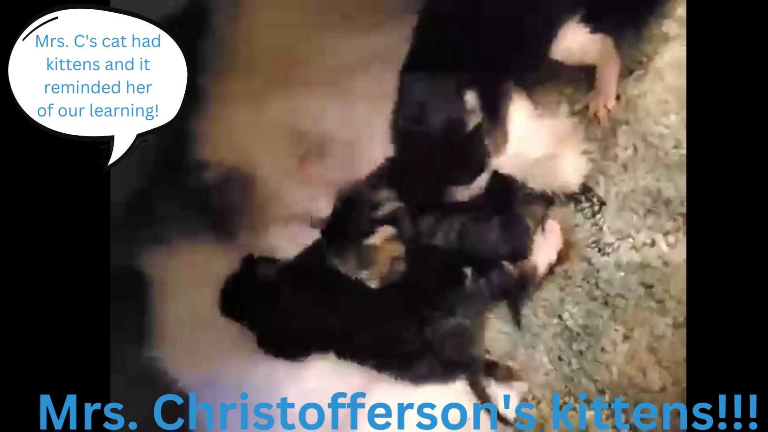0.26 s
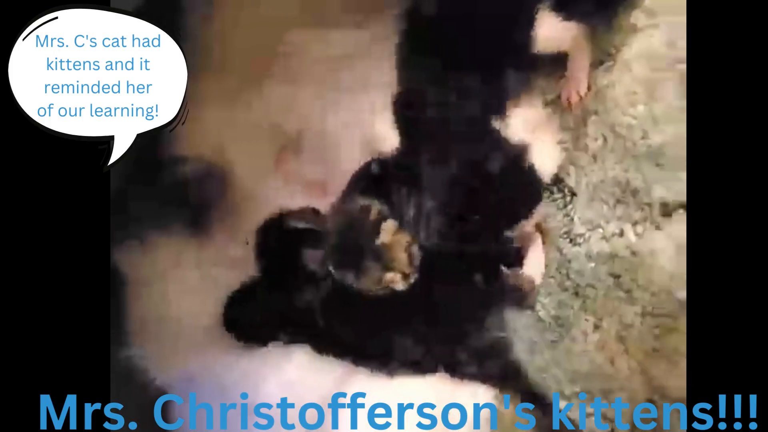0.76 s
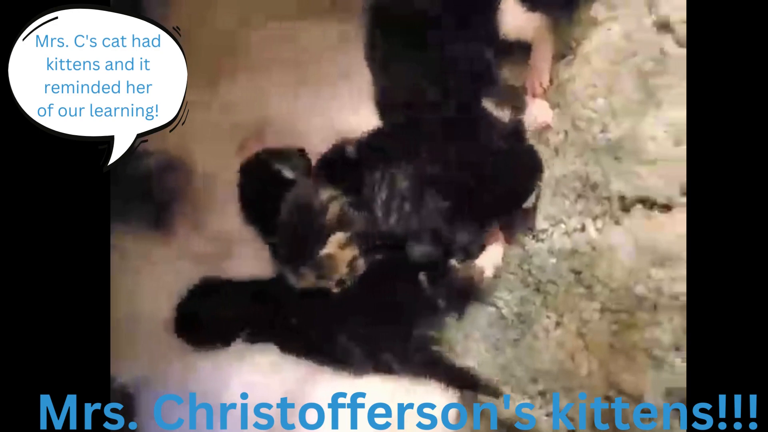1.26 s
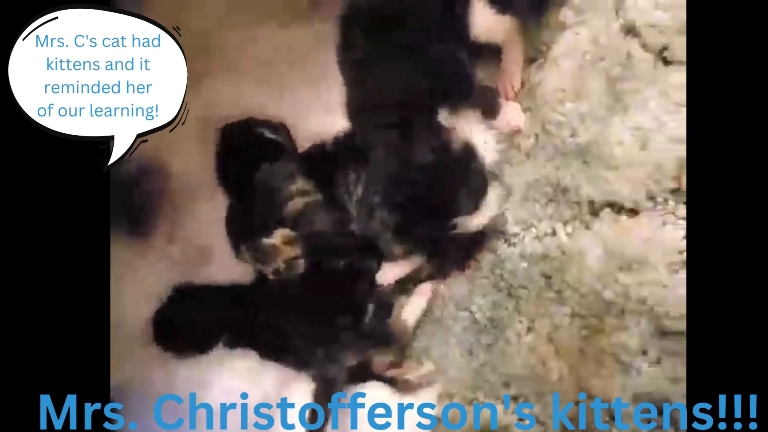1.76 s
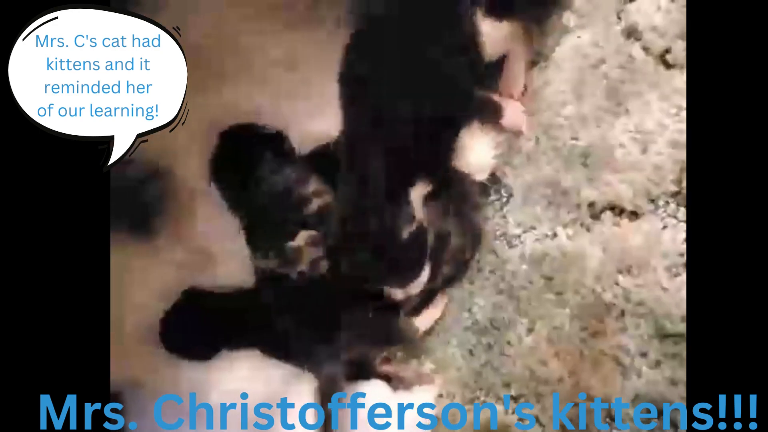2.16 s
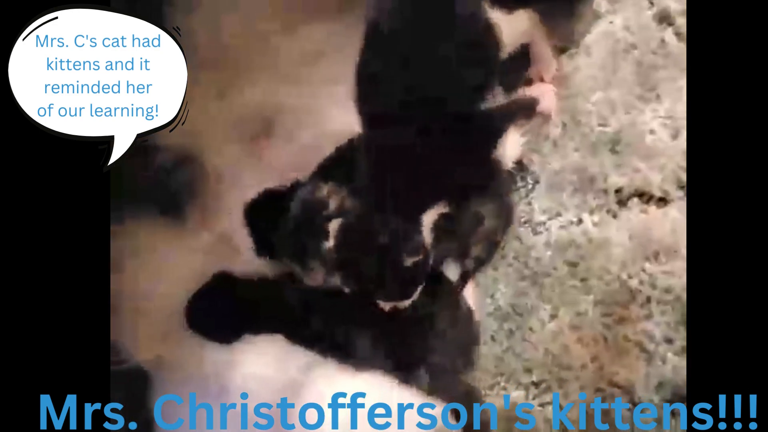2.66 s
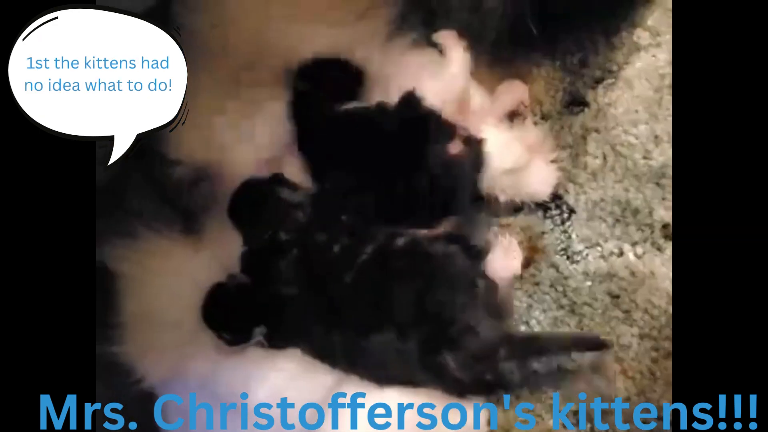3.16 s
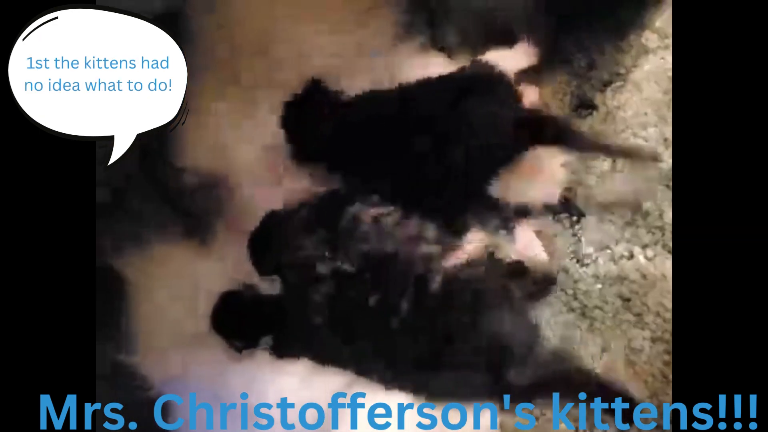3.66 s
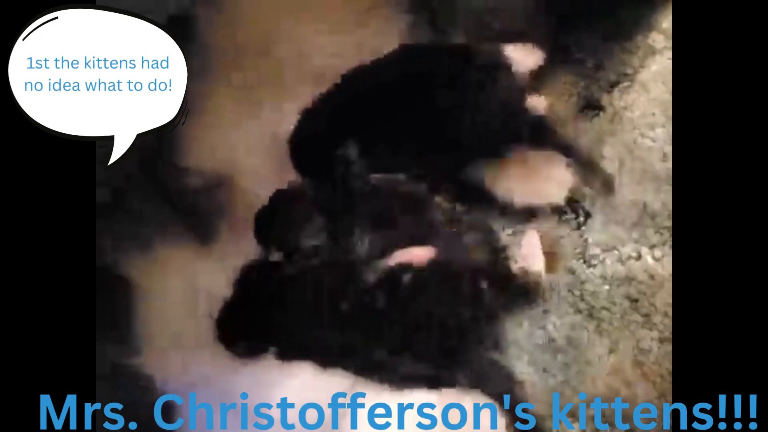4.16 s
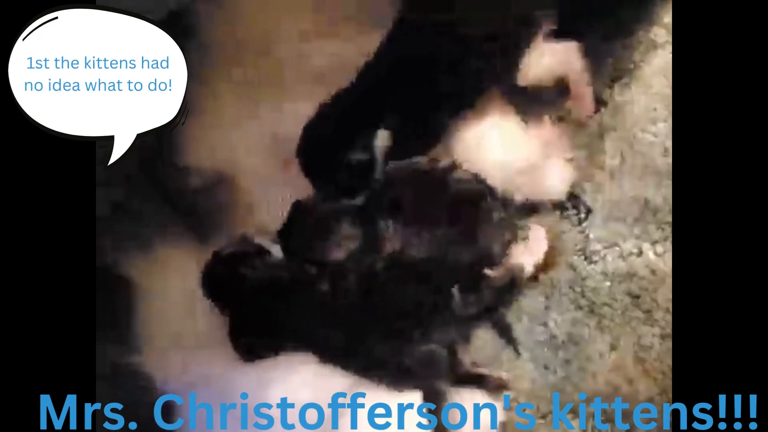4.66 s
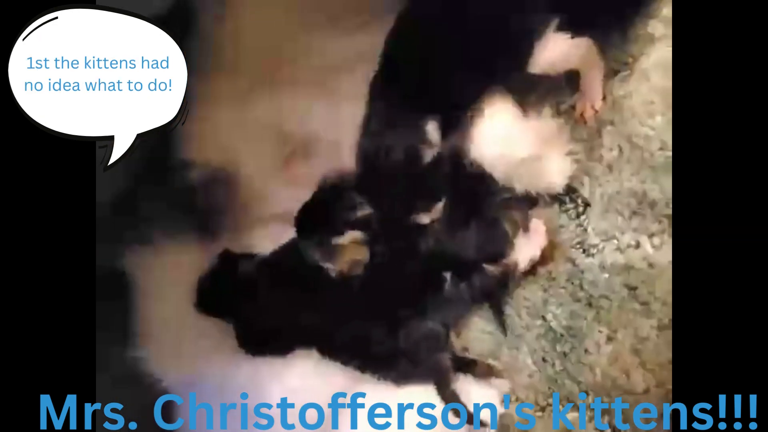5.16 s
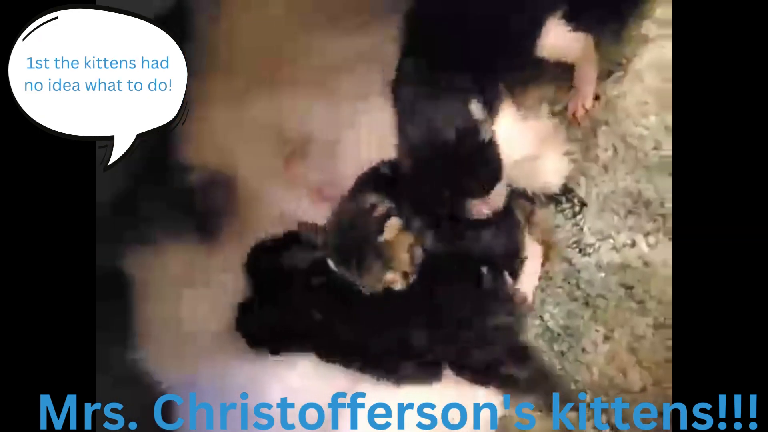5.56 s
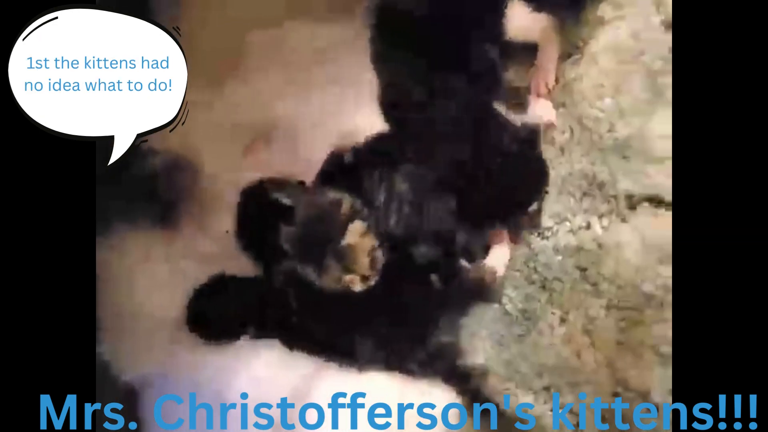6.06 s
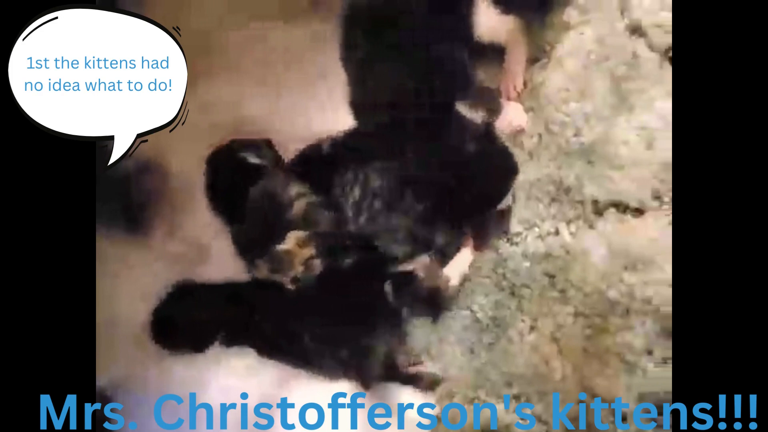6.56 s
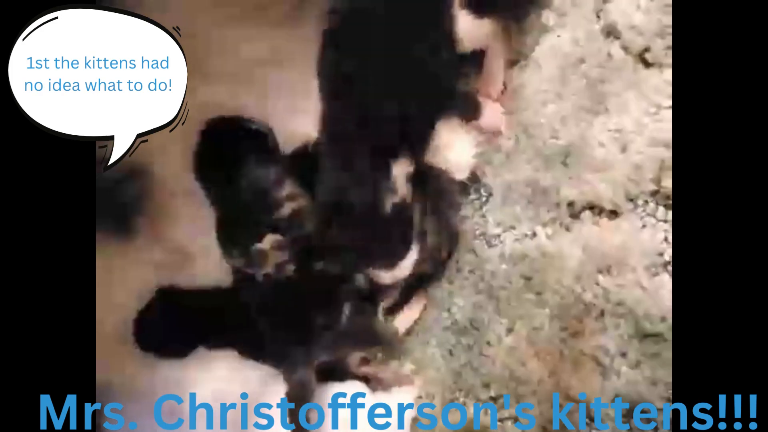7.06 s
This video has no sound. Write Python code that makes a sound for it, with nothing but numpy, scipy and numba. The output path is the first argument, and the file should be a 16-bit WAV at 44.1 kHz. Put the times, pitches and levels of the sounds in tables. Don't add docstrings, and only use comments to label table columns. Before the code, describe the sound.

A cat purrs steadily close to the microphone in a quiet room, giving five short, trilling mews with little lip smacks and soft breaths.

```python
import sys
import numpy as np
from scipy import signal
from scipy.fft import rfft, irfft, next_fast_len
from scipy.io import wavfile
from scipy.ndimage import uniform_filter1d
from numba import njit

SR = 44100
rng = np.random.default_rng(int(sys.argv[2]) if len(sys.argv) > 2 else 0)


def transcribe(signal):
    frames = np.atleast_2d(signal).T
    limited = np.clip(frames, -1, 1)
    pcm = np.round(limited * 32767).astype(np.int16)
    wavfile.write(sys.argv[1], SR, pcm)


def volts(x):
    e = np.asarray(x, float) / 20
    return 10 ** e


N = 322371

# [t/s, beats so far/1], a whole number is the widest opening
BEATS = [(0, -.2), (.255, 6), (.815, 23), (1.265, 35), (1.828, 51), (2.236, 64), (2.397, 69), (2.806, 81),
         (3.011, 87), (3.075, 89), (3.255, 95), (3.578, 104), (3.973, 117), (4.163, 123), (4.4, 130),
         (4.95, 146), (5.505, 162), (6.2, 183.55), (6.752, 200), (6.862, 203), (7.318, 215)]
# [t/s, f/Hz, level/dB, mouth resonance/Hz, mouth opening/1]
MEW_1 = [(0.244, 407.3, -40, 1080, 0.2), (.39, 507, -44, 1583, 0.49), (0.433, 500, -45, 1925, 0.47),
         (0.448, 528.8, -40.5, 1817, 0.96), (.5, 545.4, -36, 2060, 0.93), (0.601, 584.5, -44.5, 1930, 0.6),
         (0.698, 578.6, -45, 2790, 0.61), (0.762, 539.6, -44, 2470, 0.6), (0.809, 478.4, -47, 2033, 0.41)]
MEW_2 = [(1.791, 412.2, -46.5, 1230, 0.17), (1.899, 421.6, -38, 1860, 0.53),
         (1.958, 468, -35.5, 1860, 0.59), (1.988, 520, -43.5, 2480, 0.47), (2.021, 548, -44.5, 2430, 1.09),
         (2.1, 566, -43, 2540, 0.93), (2.234, 551.5, -47, 2483, 0.93), (2.268, 533.4, -40.5, 2230, 0.54),
         (2.34, 444.5, -37.5, 2020, 0.55)]
MEW_3 = [(2.69, 490, -37, 1430, 0.21), (2.74, 473, -32, 1580, 0.62), (2.798, 516.5, -39, 1740, 0.66),
         (2.899, 522.2, -41.5, 1530, 0.59), (2.98, 466, -40.5, 1310, 0.55),
         (3.05, 404.5, -38.5, 2140, 0.21), (3.132, 355.5, -43, 1169, 0.11),
         (3.199, 429.8, -38.5, 1250, 0.33), (3.3, 410.3, -36.5, 1140, 0.21)]
MEW_4 = [(3.74, 464.3, -37, 1340, 0.32), (3.819, 448.4, -32.5, 1250, 0.35), (3.919, 431.8, -37, 1320, 0.35),
         (3.97, 457.5, -33, 1420, 0.41), (4.01, 516, -39, 1440, 0.72), (4.06, 565.7, -45, 2000, 0.98),
         (4.13, 559.2, -41, 2060, 0.8), (4.19, 515.6, -38.5, 2380, 0.53), (4.235, 458.7, -37, 1920, 0.43)]
MEW_5 = [(5.6, 372, -30.5, 1200, 0.092), (5.64, 418.5, -35.5, 1135, 0.038),
         (5.821, 459.4, -35.5, 1250, 0.26), (5.878, 463.3, -36, 1428, 0.67),
         (5.94, 490.5, -44.5, 1907, 0.93), (6.002, 498, -50, 2100, 0.92), (6.045, 479, -51, 1589, 0.64),
         (6.089, 500, -50.5, 1570, 0.66), (6.14, 481, -53.5, 1550, 0.54)]
FALSE_START = [(5.47, 397, -41, 1300, .05), (5.5, 425, -46.5, 1320, .05), (5.54, 428, -42, 1260, .12),
               (5.58, 411, -46, 1260, .12)]
# [octave over fundamental/dB, its growth with a full opening/dB, cheek share/1,
# leak between resonances/1, mouth width/Hz, third under octave/dB, throat spread/1]
POSTURES = [
    (4, -4, 0.029, .01, 280, -11.5, 0.084),
    (6, 13.5, 0.27, 0.02, 230, -29, 0.16),
    (4.5, 44, 0.5, 0.027, 270, -48, 0.28),
    (0.5, 1, 0.48, 0.19, 350, -41, 0.064),
    (-3.5, 8, .1, .03, 280, -14, .11),
    (6, 22, 0.48, 0.051, 330, -31, 0.074),
]
# [t/s, hoarseness/1, trill/% of pitch,
# lean/1 (+ quick rise, - flat top and quick dip)]
GRIP = [(.25, .14, 2.5, .3), (.42, .1, 1.5, .3), (.46, .03, .25, -.4), (.69, .015, .3, -.5),
        (.75, .1, 3.5, -.5), (.79, .4, 6, -.5), (1.85, .3, 6, .4), (1.9, .25, 3, .4), (1.94, .2, 1.5, .4),
        (1.97, .12, .6, .4), (2.02, .04, .25, 0), (2.1, .02, .15, 0), (2.22, .015, .2, -.5),
        (2.26, .06, 3, -.5), (2.32, .25, 7, -.5), (2.36, .5, 7, -.5), (2.75, .2, 6, -.1),
        (2.85, .12, 6.5, -.65), (3.0, .2, 9, -.3), (3.12, .35, 9, 0), (3.76, .26, 3.2, .4),
        (3.93, .24, 4.5, .4), (4.03, .02, .3, 0), (4.12, .03, .4, -.5), (4.18, .06, 2.5, -.5),
        (4.22, .4, 10, -.5), (5.55, .6, 5, 0), (5.65, .3, 5.5, 0), (5.85, .32, 6, -.2),
        (5.97, .32, 6, -.45), (6.02, .4, 6, -.4), (6.05, .85, 8, -.3)]
# [t/s, low resonance/Hz, its level re mouth/dB, high resonance/Hz, its level re mouth/dB]
THROAT = [(.3, 3700, -15, 5500, -28), (.45, 3700, -30, 5300, -42), (.5, 3600, -28, 5400, -33),
          (.58, 3360, 0, 5600, -19), (.64, 3460, -4.5, 5650, -13), (.7, 3570, -9, 5260, -2.5),
          (.78, 4100, -8, 5500, -20.5), (1.85, 4000, -10, 5610, -18.5), (1.95, 3650, -10.5, 5600, -36),
          (2.0, 3650, -14.5, 5170, -8.5), (2.03, 3670, -15.5, 4900, -26), (2.1, 3920, -2.5, 4960, -16),
          (2.2, 3920, -2.5, 5200, -21.5), (2.33, 3886, -7.5, 5500, -21), (2.74, 3890, -21, 5150, -14),
          (2.8, 3700, -13, 5760, -7), (2.85, 3700, -13, 6100, -7), (2.93, 3700, -17, 5960, -8),
          (3.1, 3900, -9, 5600, -11), (3.25, 3900, -17, 5200, -24), (3.78, 3800, -8.5, 6200, -20),
          (3.95, 4050, -6, 5960, -34), (4.06, 3970, -18, 5860, -32), (4.1, 3900, -24, 5640, -20),
          (4.16, 3850, -17, 5460, -13), (4.2, 3810, -13, 5300, -24), (5.85, 4000, -13.5, 5300, -19),
          (5.92, 4350, -9.5, 5200, -15), (6.0, 4660, -13, 5800, -12), (6.08, 4130, -10, 5240, -11)]
# [t/s, length/s, strong-weak alternation of the folds/1, change of the
# octave/dB]
WOBBLES = [(.47, .05, 0, 0), (.56, .05, .08, 0), (2.014, 0.035, 0.08, -1.5), (2.078, 0.044, 0.11, 3.5),
           (2.292, 0.028, 0.23, 0), (2.766, 0.047, 0.2, -1.5), (4.046, .04, 0.05, -1),
           (4.065, 0.038, 0.02, -22), (5.967, .06, 0.14, -2), (2.74, .05, 0.14, 3), (3.237, 0.07, .02, 6),
           (4.183, 0.074, .02, 5.5), (5.66, .03, .02, 5.5), (5.815, .03, .02, 1.5)]
# [start/s, end/s, flow/dB, nose boom over flow/dB, pulsing/dB]
BREATHS = [(-.05, 0.248, -62, 5, 2.5), (0.235, 0.872, -61, 0.5, 1), (0.837, 1.316, -68.5, 1, 7),
           (1.301, 1.617, -74, -6, 4), (1.594, 1.83, -81, -3.5, 3.5), (1.786, 2.461, -60.5, 0, 2.5),
           (2.335, 2.61, -67, 4, 0.5), (2.681, 3.005, -56, -2, 0), (2.965, 3.346, -57.5, 0.5, 2),
           (3.398, 3.577, -100, 13, 6), (3.549, 3.774, -69.5, 8, 1), (3.731, 4.295, -56.5, -4, 2),
           (4.259, 4.39, -69.5, 8, -2.5), (4.356, 4.704, -58.5, 13, 3), (4.714, 5.14, -70.5, 10, 4.5),
           (5.125, 5.229, -63.5, 0, 4.5), (5.193, 5.49, -72.5, 11, 2.5), (5.455, 5.766, -55, 7.5, 3.5),
           (5.733, 6.31, -64.5, 6.5, 5.5), (6.338, 6.558, -61, 15.5, 4.5), (6.514, 6.771, -56.5, 13, 6),
           (6.83, 6.962, -71.5, 16, 12.5), (6.932, 7.402, -66, 14.5, 14)]
# [f/Hz, width/Hz, level/dB]
AIRWAY = [(1250, 500, 11), (2950, 810, 14), (4093, 410, 13), (6145, 1060, 12), (6910, 700, 10),
          (8660, 600, 8.5), (11800, 3400, -6), (14000, 1200, -11)]
# [t/s, stretch of the resonances/1, cheek and flat hiss/dB]
PASSAGE = [(0, 1.01, -1.5), (.8, 1.01, 0), (1.1, .98, -8.5), (1.45, 1.01, -3), (1.8, 1.01, 0.5),
           (2.5, 0.96, -3), (3.3, 1.003, 3), (3.8, 1.01, 7.5), (4.38, 1.11, -8), (4.68, 1.0, -6),
           (4.8, 1.01, 3.5), (5.45, 1.017, 3.5), (5.7, 1.01, -5.5), (6.4, 1.01, -2), (6.75, 1.016, 1),
           (6.86, 1.1, -9.5), (7.3, 1.04, -13)]
# [t/s, resonance/Hz]
NOSE = [(0, 278.5), (4.7, 313), (6.2, 321), (6.5, 358)]
# [t/s, level at a flow of -61 dB/dB]
DRAUGHT = [(0, -63.5), (.7, -59), (1.2, -64), (2.0, -56.5), (2.62, -63), (3.2, -56.5), (3.5, -57.5),
           (4.1, -60), (4.55, -53), (5.3, -54), (5.6, -63), (5.9, -61.5), (6.2, -55), (6.5, -63.5),
           (6.9, -53), (7.3, -57.5)]
# [first t/s, last t/s, first peak/dB, last peak/dB,
# low thud re peak/dB]
SNAPS = [(1.0937, 1.252, -51, -51, 5), (1.328, 1.3275, -49.5, -47, 5), (1.3769, 1.3776, -40.5, -44.5, -7.5),
         (1.46, 1.46, -51, -52, -4), (3.4257, 3.5628, -55.5, -54, 4.5), (2.976, 3.005, -43, -41, -14),
         (3.05, 3.049, -31, -42, -10), (3.097, 3.097, -40, -45, -12), (3.22, 3.22, -46, -41, -12),
         (4.3946, 4.3944, -59, -65, 22), (4.7625, 4.7628, -44.5, -45, 6),
         (4.8332, 4.8335, -37.5, -34, -6.5), (4.903, 4.9367, -41.5, -42, -4.5),
         (5.1516, 5.1523, -38, -47, -30), (5.699, 5.699, -42, -44, -15), (6.06, 6.163, -41, -44, -10),
         (.84, .937, -57, -54, -14), (6.85, 6.9628, -34.5, -30, -8.5), (7.002, 7.116, -34, -36.5, -9.5),
         (7.155, 7.3045, -39.5, -41, -7)]
# [t/s, peak/dB, ring f/Hz, grit re ring/dB]
SMACKS = [(0.4358, -24.5, 1660, 11), (0.7801, -30.5, 2184, 5.5), (1.0006, -55.5, 11970, -31),
          (1.0091, -48, 11500, -29.5), (1.0462, -45, 11600, -30), (1.8755, -30.5, 1900, 7),
          (2.337, -31, 2130, 1), (2.6862, -48.5, 1357, 4), (2.709, -32, 1490, 6), (3.9804, -15.5, 1550, 0),
          (4.2276, -35.5, 2180, 11), (0.392, -31, 2120, 0), (.499, -30, 2130, 2),
          (1.5639, -58.5, 11500, -28.5), (2.753, -41, 11830, -30), (3.5639, -47, 11200, -30),
          (5.5394, -54, 11400, -30), (5.57, -42, 11300, -30), (5.798, -41.5, 3970, 10),
          (7.21, -48, 11800, 8), (.808, -39, 2050, -8), (0.8182, -40, 2000, -2), (.617, -44, 8090, -32),
          (4.15, -27, 2550, -4), (6.087, -38, 1510, -8), (.408, -32, 2030, -12), (2.754, -30, 4000, -8)]
# [t/s, peak/dB, f/Hz, length/s]
BUMPS = [(.63, -46, 85, 0.035), (2.723, -41.5, 290, 0.033), (2.76, -43, 238, 0.042),
         (3.225, -39.5, 180.4, 0.041), (1.45, -56, 140, .05), (3.65, -52, 62, .05), (3.9, -53, 60, .05),
         (4.999, -52, 90, 0.048), (5.294, -46.5, 251, 0.01), (6.077, -48, 198, 0.023),
         (6.153, -43, 180, 0.019), (6.896, -45, 98, 0.025)]
# [t/s, peak/dB, f/Hz, length/s]
SQUEAKS = [
    (.495, -26, 2130, .014),
    (5.499, -45, 4150, 0.0098),
    (5.579, -40, 3740, 0.0077),
    (5.608, -40.5, 3900, 0.009),
    (5.992, -27.5, 2150, 0.018),
    (6.092, -29.5, 1530, 0.018),
    (6.055, -36, 829.3, 0.012),
]
# [f/Hz, density/dB per Hz]
ROOM = [(18, -26.5), (42, 1), (483, -10.5), (1530, -21.5), (1990, -19), (2210, -19), (13200, -37),
        (15800, -44)]

SHUT_DB, OPENING_DB = -21, 40.5
ATTACK_S, RELEASE_S, RELEASE_DB = 0.023, 0.06, -39.5
FUZZ_DB, HISS_DB, HISS_PULSE_DB = -38, -33, 5.5
POCKET_HZ, POCKET_WIDTH_HZ, POCKET_DEPTH = 4300, 200, 0.53
BREATH_IN_S, BREATH_OUT_S, PAUSE_DB = 0.038, 0.046, -101.5
NOSE_SWELL_DB = 2
RUMBLE_PER_FLOW = 0.21
SNAP_SCATTER_DB, BEAT_SCATTER_DB = 1.5, 1.5
ROOM_DB = -57


def mew(table, posture, turn):
    start_s, end_s = table[0][0], table[-1][0]
    t = np.arange(int(start_s * SR), int((end_s + RELEASE_S) * SR)) / SR
    n = len(t)
    turn = turn[int(start_s * SR):][:n]
    hz, level_db, mouth_hz, opening = columns(table, t)
    level_db = level_db + RELEASE_DB * np.clip((t - end_s) / RELEASE_S, 0, 1)
    mouth_db = level_db + SHUT_DB + OPENING_DB * opening
    octave_split_db, split_growth_db, _, _, mouth_width, third_db, _ = posture
    split_db = octave_split_db + split_growth_db * (opening - 0.5)
    first_db, octave_db = level_db - split_db / 2, level_db + split_db / 2
    throat_hz, throat_db, high_hz, high_db = columns(THROAT, t)
    throat_db, high_db = mouth_db + throat_db, mouth_db + high_db
    swell = np.array([np.exp(-(2 * (t - s) / length) ** 2) for s, length, *_ in WOBBLES])
    uneven, loss_db = np.transpose(WOBBLES)[2:] @ swell
    hoarse, trill_percent, lean = columns(GRIP, t)
    trill = trill_percent / 100

    beat = np.cos(turn - 0.35)
    bend = np.cos(turn - 0.35 + lean * (beat - 1) + np.minimum(lean, 0) * np.sin(turn - 0.35))
    sung = hz * (1 + 1.4 * trill * bend + (0.0002 + 0.03 * hoarse) * walk(300, size=n))
    cycle = np.cumsum(2 * np.pi * sung / SR)
    k = np.arange(1, 27)[:, None]

    cheek_drive = np.clip((mouth_db - first_db) / 10, 0, 1)
    tracts = vocal_tract(k, posture, opening, mouth_hz, cheek_drive, throat_hz, high_hz)
    gain = np.zeros((len(k), n))
    for tract, db in zip(tracts, (mouth_db, throat_db, high_db)):
        gain += volts(db) * tract(k * sung) / np.sqrt(np.sum(tract(k * hz) ** 2, axis=0))
    gain *= 1 - POCKET_DEPTH / (1 + ((k * sung - POCKET_HZ) / POCKET_WIDTH_HZ) ** 2)
    gain[0] = volts(first_db + 160 * np.clip(lean, -0.45, 0) * (sung / hz - 1))
    gain[1] = volts(octave_db + loss_db)
    gain[2] += volts(octave_db + third_db)
    gain[2:] *= 1 + uneven * np.cos(cycle / 2) * (1 + 0.5 * walk(80, size=n))
    shimmer = volts((0.6 + 2.5 * hoarse) * np.array([walk(60, size=n) for _ in k]))

    chop_db = np.clip(3 + 0.45 * (first_db - mouth_db), 0, 8) * np.clip(trill * 22, 0, 1)
    gate = np.tanh(1.5 * np.cos(turn + 0.3) + 0.6) - 0.6
    scatter_db = BEAT_SCATTER_DB * np.clip(trill * 20, 0, 1) * walk(35, size=n) / 1.7
    chop = volts(chop_db * gate + scatter_db)

    flare_db = np.clip(np.minimum(110 * trill, 6) - chop_db, 0, 8)
    flare_db = flare_db * (np.cos(turn + 1.2 - 0.5 * np.cos(turn + 1.2)) - 0.4)

    def flare(order):
        return volts(np.clip((order - 2.5) / 6, 0, 1) * flare_db)

    waves = np.cos(k * cycle - 0.16 * (k - 5) ** 2)
    depth = np.where(k > 1, 1, 0.85)
    tone = -np.sqrt(2) * np.sum(gain * chop ** depth * shimmer * flare(k) * waves, axis=0)

    air = rng.standard_normal((3, n))
    rasp = volts(mouth_db) * cavity_noise(air[0], mouth_hz, 1.3 * mouth_width, 900)
    rasp += volts(throat_db - 2.5) * flare(9) * cavity_noise(air[1], throat_hz, 600, 900)
    rasp += volts(high_db - 2.5) * flare(9) * cavity_noise(air[2], high_hz, 1300, 1600)
    rasp += (volts(octave_db) + volts(first_db - 4)) * cavity_noise(air[2], 1.7 * hz, 800, 1000)
    rasp += volts(first_db - 7) * cavity_noise(air[0], 1250, 450, 600)

    hiss_pulse_db = HISS_PULSE_DB * np.clip(trill * 20 - 2 * lean, 0, 1) * np.cos(turn + 1.6)
    leak = volts(mouth_db + FUZZ_DB) * unit(band(air[1], 4800, 3500))
    leak += volts(level_db + HISS_DB + hiss_pulse_db) * unit(band(air[0], 8000, 12000))
    attack = np.clip((t - t[0]) / ATTACK_S, 0, 1)
    return attack * (tone * (1 - 0.5 * hoarse) + 0.65 * np.sqrt(chop) * hoarse * rasp + leak)


def vocal_tract(k, posture, opening, mouth_hz, cheek_drive, throat_hz, high_hz):
    _, _, cheek_share, leak, mouth_width, _, spread = posture

    def mouth(f):
        peak = 1 / (1 + ((f - mouth_hz) / mouth_width) ** 2) ** 0.87
        floor = leak * np.clip(opening, 0, 1) ** 2
        cheek = cheek_share * cheek_drive / (1 + ((f - 2750) / 200) ** 2)
        return (k > 2) * (peak + floor + cheek) / (1 + (f / 3300) ** 12)

    def throat(f):
        peak = 1 / (1 + ((f - throat_hz) / 290) ** 2) + 0.2 * spread
        top = 0.012 / (1 + ((f - 12400) / 1100) ** 4)
        return peak / (1 + (f / 6000) ** 8) / (1 + (3100 / f) ** 12) + top

    def high(f):
        peak = 1 / (1 + ((f - high_hz) / 620) ** 4)
        return (peak + spread / (1 + (f / 8500) ** 10)) / (1 + (4300 / f) ** 12)

    return mouth, throat, high


def breath(t, turn):
    hiss_db, rumble_db, nose_db, pulse_db = breath_flow(t)
    nose_hz = columns(NOSE, t)[0]
    stretch, cheek_db = columns(PASSAGE, t)
    air = rng.standard_normal((4, N))
    drift = stretch + 0.008 * walk(6)

    hiss = 0.33 * volts(cheek_db) * air[1]
    for f, width, db in AIRWAY:
        level_db = db + 1.75 * walk(35)
        if 2000 < f < 3500:
            level_db = level_db + cheek_db
        if 10000 < f < 13000:
            level_db = level_db + 0.4 * pulse_db
        if f < 2000:
            level_db = level_db + 0.5 * cheek_db
        hiss = hiss + volts(level_db) * band(band(air[0], f * drift, width), f * drift, 2.0 * width)

    rumble = cavity_noise(air[1], 120, 260, 240, second_hz=123) * volts(2.47 * walk(18))
    nose = cavity_noise(air[2], nose_hz, 140, 180)
    nose += 0.35 * cavity_noise(air[3], 2.62 * nose_hz, 260, 400, second_hz=2.6 * nose_hz)
    puff_db = pulse_db * (np.tanh(2.4 * (np.cos(turn - 0.15) + 0.26)) - 0.5)

    out = unit(hiss) * volts(hiss_db + 4.5 + puff_db)
    out += nose * volts(nose_db + 0.5 * puff_db + 1.2 * walk(40))
    out += rumble * volts(rumble_db)
    return out + unit(band(air[2], 5000, 16000)) * volts(-75 + 0.32 * (hiss_db + 69))


def breath_flow(t):
    flow, boom, pulsing = volts(PAUSE_DB), volts(PAUSE_DB + 11.0), 0
    for start, end, flow_db, nose_db, pulse_db in BREATHS:
        hold = np.clip(np.minimum((t - start) / BREATH_IN_S, (end - t) / BREATH_OUT_S), 0, 1)
        growth = np.interp(t, [start, end], volts([-NOSE_SWELL_DB, NOSE_SWELL_DB]))
        flow = flow + hold * volts(flow_db)
        boom = boom + hold * volts(flow_db + nose_db) * growth
        pulsing = pulsing + hold * pulse_db
    flow_db = 20 * np.log10(flow)
    rumble_db = columns(DRAUGHT, t)[0] + RUMBLE_PER_FLOW * (flow_db + 61.0)
    return flow_db, rumble_db, 20 * np.log10(boom), pulsing


def snap(t, thud_db):
    grit = rng.standard_normal(len(t))
    spike = grit * np.exp(-t / 0.0007) - 4 * np.exp(-(t / 0.00005 - 2) ** 2)
    ring = 0.08 * spike + 1.1 * band(spike, 9100, 7000)
    for f, width, db in AIRWAY[2:]:
        ring += volts(db) * band(spike, f, 0.99 * width)
    thud = -np.cos(2 * np.pi * 1150 * t) * np.exp(-t / 0.0016)
    thud += 1.34 * np.sin(2 * np.pi * 380 * t) * np.exp(-t / 0.001)
    return ring / -ring[np.abs(ring).argmax()] + volts(thud_db + 2.0) * thud


def smack(t, hz, grit_db):
    ring = np.sin(2 * np.pi * hz * t) * np.exp(-t / 0.0034 * max(1, hz / 5000))
    grit = rng.standard_normal(len(t)) * np.exp(-t / 0.0013)
    for width in (4600, 4600, 6000):
        grit = band(grit, 3000, width)
    return (ring + volts(grit_db) * grit) * np.minimum(t / 0.00024, 1)


def clicks():
    t = np.arange(600) / SR
    out = np.zeros(N + len(t))
    for first, last, first_db, last_db, thud_db in SNAPS:
        count = int(round(np.ptp(columns(BEATS, [first, last])[0]))) + 1
        peaks_db = np.linspace(first_db, last_db, count) + SNAP_SCATTER_DB * rng.standard_normal(count)
        for s, db in zip(np.linspace(first, last, count), peaks_db):
            out[int(s * SR):][:len(t)] += volts(db) * snap(t, thud_db)
    for s, db, hz, grit_db in SMACKS:
        out[int(s * SR):][:len(t)] += volts(db) * smack(t, hz, grit_db)
    return out[:N]


def bumps(t):
    out = np.zeros(len(t))
    for s, db, hz, length in BUMPS + SQUEAKS:
        out += volts(db) * np.sin(2 * np.pi * hz * (t - s)) * np.exp(-(2 * (t - s) / length) ** 2)
    return out


def echo(cat):
    t = np.arange(8000) / SR
    tail = band(rng.standard_normal(len(t)), 1200, 2400) * np.exp(-np.log(1000) * t / 0.44)
    return signal.fftconvolve(cat, tail / np.sqrt(np.sum(tail ** 2)))[:N]


def room_tone():
    size = next_fast_len(N)
    hz = np.arange(size // 2 + 1) * SR / size
    hush = irfft(rfft(rng.standard_normal(size)) * shape(ROOM, hz), size)[:N]
    return unit(hush) * volts(ROOM_DB - 5.0 + walk(3.2))


def unit(x):
    return x / np.sqrt(np.mean(x ** 2))


def columns(table, t):
    s, *rest = np.transpose(table)
    return [np.interp(t, s, c) for c in rest]


def shape(points, hz):
    f, db = np.transpose(points)
    return volts(np.interp(np.log(hz + 1), np.log(f), db))


@njit
def svf(x, hz, width):
    y, band_state, low_state = np.empty(len(x)), 0., 0.
    for i in range(len(x)):
        g, k = np.tan(np.pi * hz[i] / SR), width / hz[i]
        v = (band_state + g * (x[i] - low_state)) / (1 + g * (g + k))
        band_state = 2 * v - band_state
        low_state += 2 * g * v
        y[i] = k * v
    return y


def band(x, hz, width):
    return svf(x, hz + np.zeros(len(x)), float(width))


def cavity_noise(air, hz, width, second_width, second_hz=None):
    second_hz = hz if second_hz is None else second_hz
    return unit(band(band(air, hz, width), second_hz, second_width))


def walk(rate, size=N):
    k = int(SR / rate)
    held = np.repeat(rng.standard_normal(size // k + 1), k)
    return 2.27 * uniform_filter1d(uniform_filter1d(held, k), k)[:size]


def scene():
    t = np.arange(N) / SR
    turn = 2 * np.pi * columns(BEATS, t)[0]
    cat = breath(t, turn) + clicks() + bumps(t)
    for table, posture in zip((MEW_1, MEW_2, MEW_3, MEW_4, FALSE_START, MEW_5), POSTURES):
        voice = mew(table, posture, turn)
        cat[int(table[0][0] * SR):][:len(voice)] += voice
    return (cat + volts(-24) * echo(cat) + room_tone())[None]


def low_pass(x):
    return signal.sosfilt(signal.butter(12, 16450, fs=SR, output="sos"), x)


def record(dry):
    bass_cut = signal.sosfilt(signal.butter(4, 56, "high", fs=SR, output="sos"), dry)
    top_cut = signal.sosfilt(signal.ellip(8, 0.2, 70, 15750, fs=SR, output="sos"), bass_cut)
    return low_pass(top_cut)


dry = scene()
out = record(dry)
transcribe(out)
```